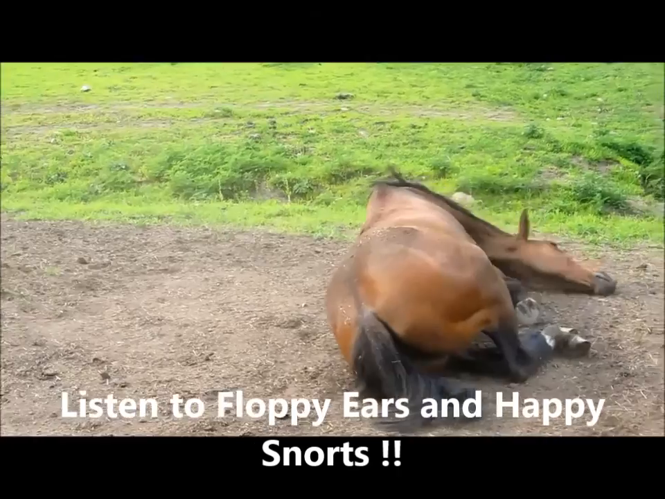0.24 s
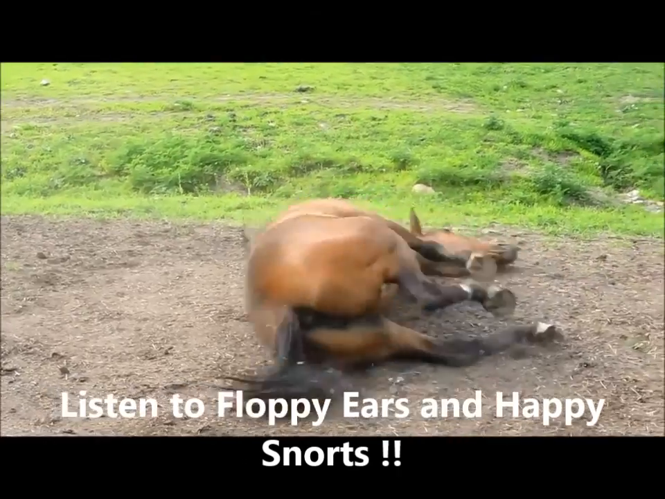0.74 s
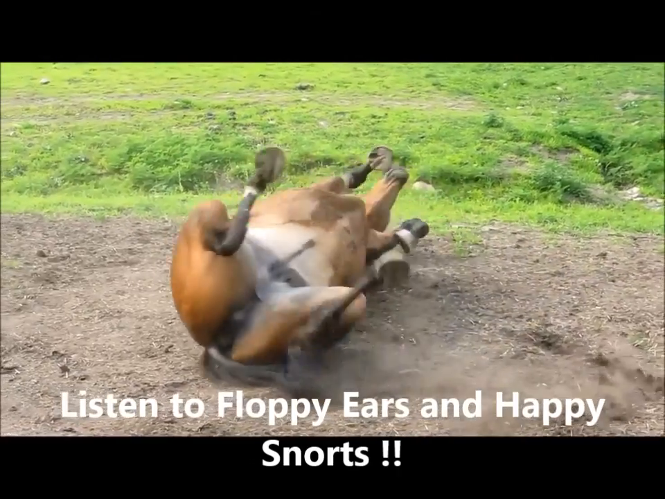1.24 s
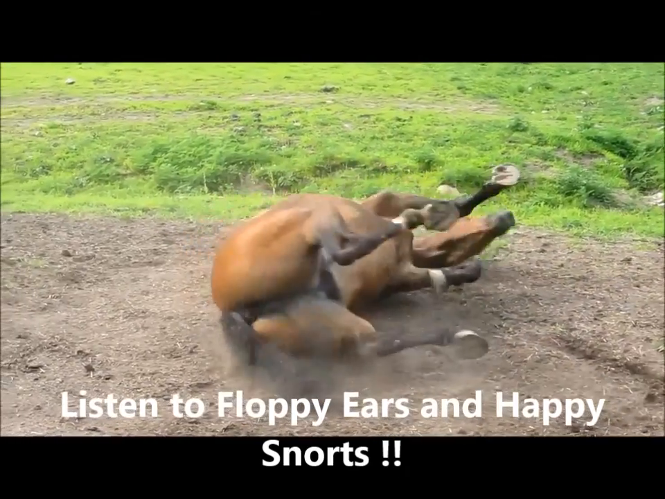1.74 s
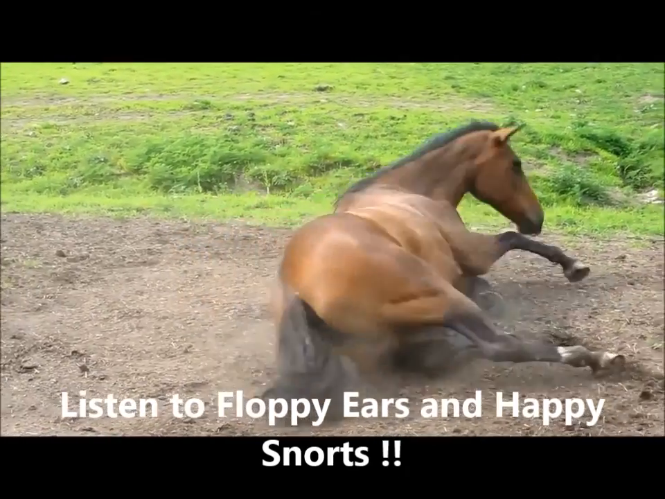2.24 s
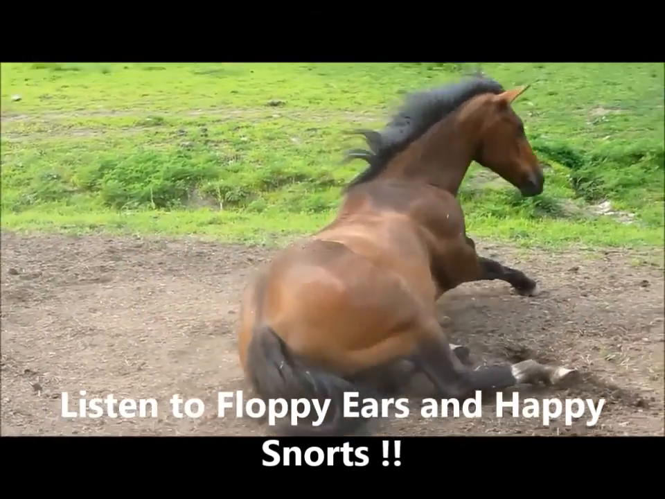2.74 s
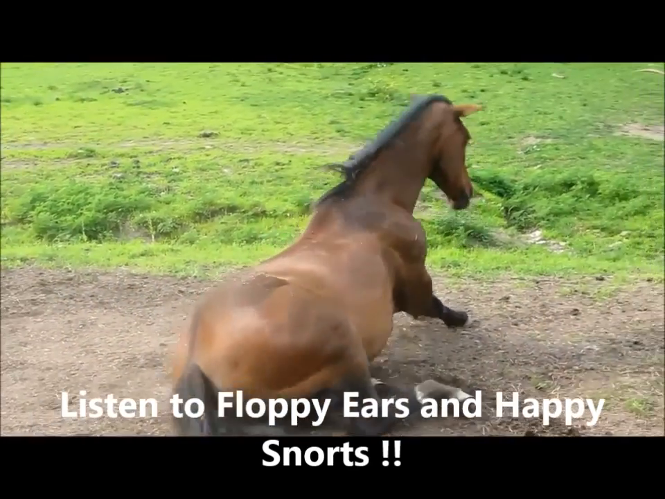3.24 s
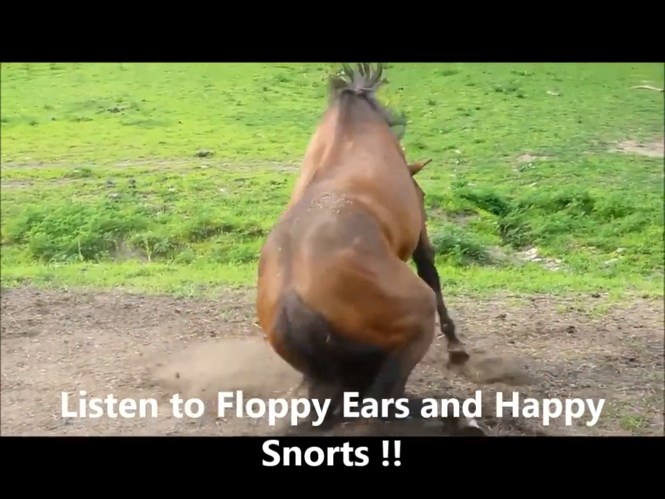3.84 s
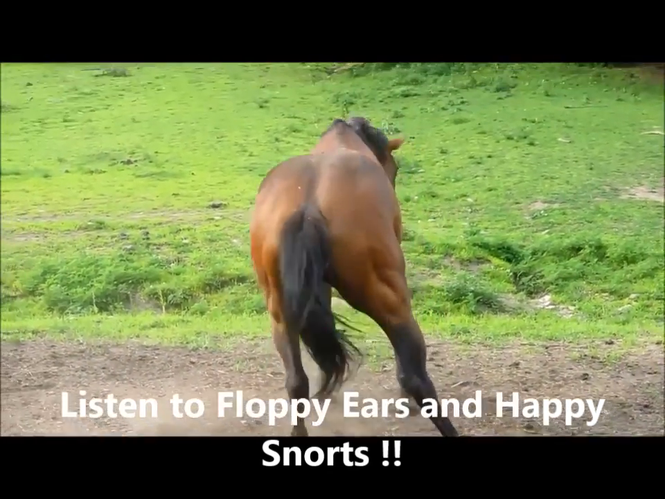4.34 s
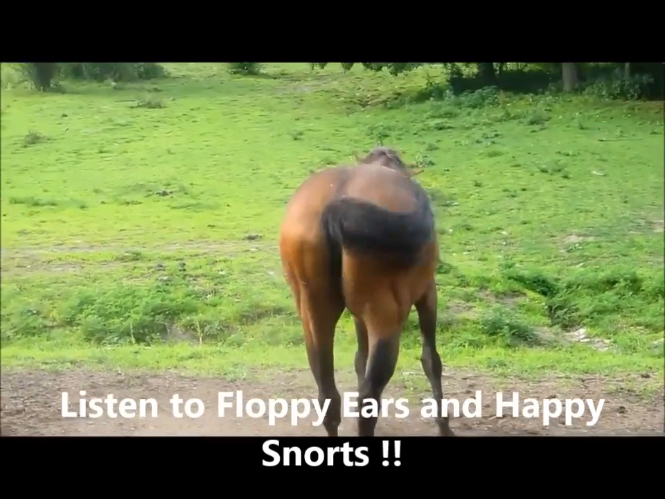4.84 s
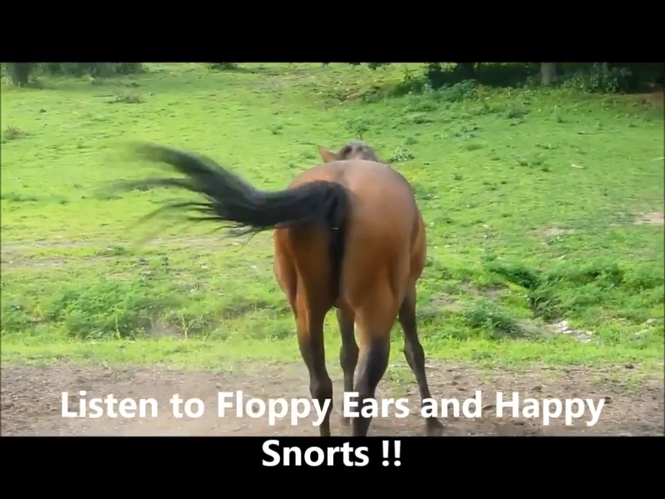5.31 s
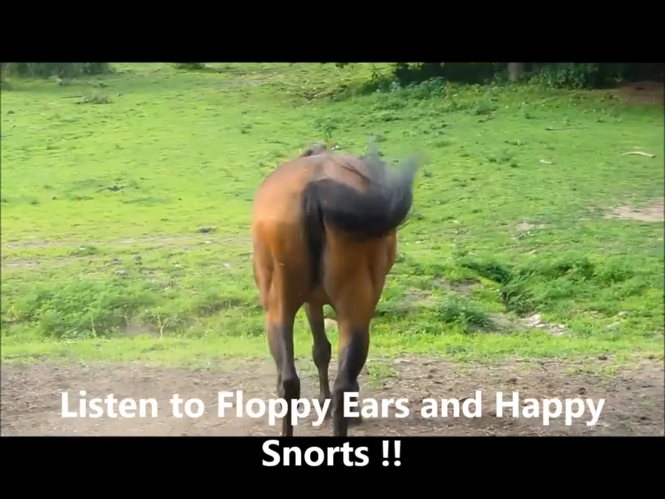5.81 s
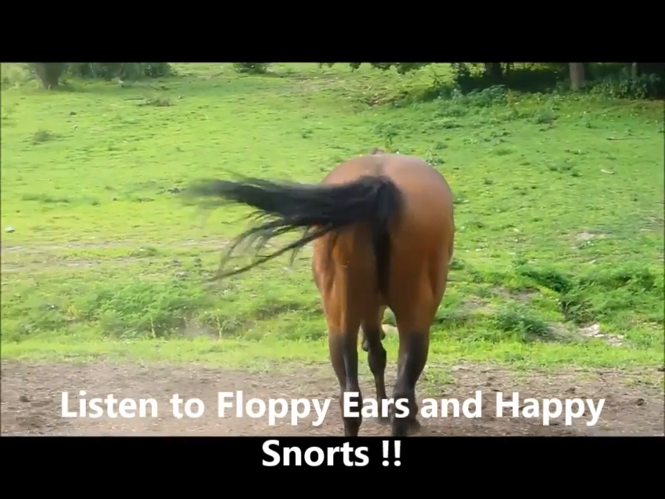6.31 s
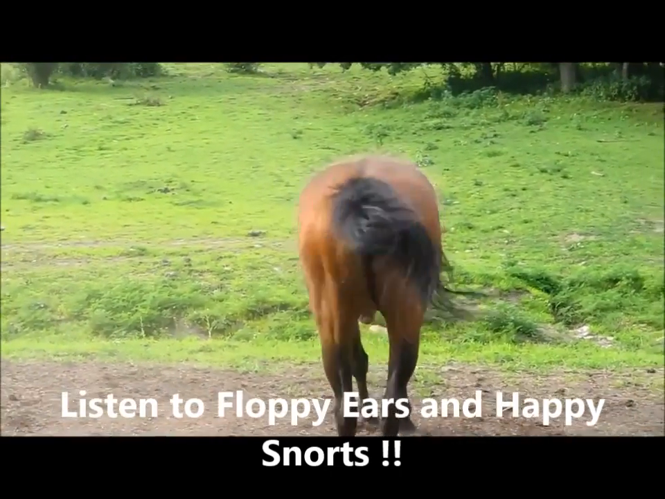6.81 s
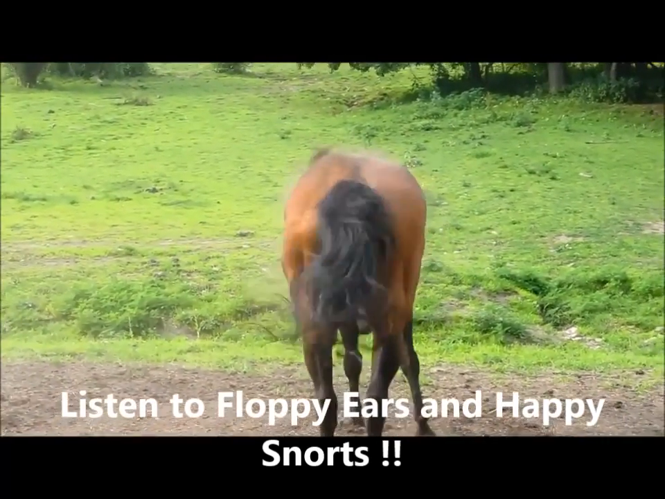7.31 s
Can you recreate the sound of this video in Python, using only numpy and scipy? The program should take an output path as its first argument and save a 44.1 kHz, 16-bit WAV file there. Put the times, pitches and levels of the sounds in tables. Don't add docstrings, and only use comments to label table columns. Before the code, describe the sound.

Quiet outdoor paddock in stereo: faint distant country noise and slight low wind bumps. A horse rubs and slides on dry soil, hooves ticking on pebbles, then rises with a rough sinking grunt running into a wet nostril-flapping snort. Airy tail swishes follow, then a short grunt, a harder snort, small puffs and a rapid dull flutter of ears. Throughout, a piercing bird whistle repeats regularly, ringing on in the trees and growing louder.

```python
import sys
import numpy as np
from scipy import signal
from scipy.io import wavfile
from scipy.ndimage import uniform_filter1d

SR = 44100
rng = np.random.default_rng(int(sys.argv[2]) if len(sys.argv) > 2 else 0)


def convert_level_to_amplitude(level_db):
    exponent = np.asarray(level_db, float) / 20
    return 10 ** exponent


def wrap_up_sound(samples):
    columns = np.atleast_2d(samples).T
    tamed = np.clip(columns, -1, 1)
    steps = np.round(tamed * 32767).astype(np.int16)
    wavfile.write(sys.argv[1], SR, steps)


N = 333396


def at_hz(points, hz):
    points = np.array(points)
    return np.interp(np.log(hz), np.log(points[:, 0]), points[:, 1])


def rms_one(x):
    return x / np.sqrt(np.mean(x ** 2) + 1e-20)


def drift(rate_hz, size=N):
    r = np.exp(-2 * np.pi * rate_hz / SR)
    settle = 9000
    noise = rng.standard_normal(size + settle)
    return rms_one(signal.lfilter([1], [1, -2 * r, r * r], noise)[settle:])


def band(x, low_hz, high_hz):
    return signal.sosfilt(signal.butter(2, [low_hz, high_hz], "band", fs=SR, output="sos"), x)


def resonate(x, modes):
    out = 0
    for k, (hz, width_hz, level_db) in enumerate(modes):
        r = np.exp(-np.pi * width_hz / SR)
        top = [(1 - r * r) / 2, 0, (r * r - 1) / 2]
        bottom = [1, -2 * r * np.cos(2 * np.pi * hz / SR), r * r]
        out = out + (-1) ** k * convert_level_to_amplitude(level_db) * signal.lfilter(top, bottom, x)
    return out


def patchy(x, modes, patch_db):
    out = 0
    for k, mode in enumerate(modes):
        out = out + (-1) ** k * resonate(x, [mode]) * convert_level_to_amplitude(patch_db * drift(20, size=len(x)))
    return out


def swell(middle_s, half_s):
    out = np.zeros(N)
    first = max(round((middle_s - 4 * half_s) * SR), 0)
    last = min(round((middle_s + 4 * half_s) * SR), N)
    near = np.arange(first, last)
    out[near] = np.exp(-((near / SR - middle_s) / half_s) ** 2)
    return out


def spell(rows):
    time_s, *columns = np.transpose(rows)
    t = np.arange(time_s[0], time_s[-1], 1 / SR)
    return round(time_s[0] * SR), [np.interp(t, time_s, c) for c in columns]


def add(out, start, x):
    x = x[..., max(-start, 0):N - start]
    start = max(start, 0)
    out[..., start:start + x.shape[-1]] += x


# time_s, pitch_hz, effort_db
GRUNT_RISING = [(3.74, 169.3, -58), (3.782, 169.4, -41.5), (3.863, 124, -37.5), (3.928, 127.8, -37.5),
                (3.956, 108.5, -38.5), (3.985, 92, -33.5), (4.02, 79.5, -50)]
GRUNT_STANDING = [(5.919, 120, -81), (5.942, 115.5, -61.5), (6.054, 118.2, -50), (6.101, 108.3, -48),
                  (6.15, 100, -41.5), (6.192, 88.3, -41), (6.244, 68.9, -40.5), (6.269, 61.2, -62)]
GRUNT_AFTER = [(6.61, 72, -68), (6.66, 87.5, -51.5), (6.72, 89.8, -60), (6.759, 87.4, -47),
               (6.831, 97.4, -44), (6.86, 94, -67)]
# hz, level_db
THROAT = [(130, 2), (170, -5.5), (200, 1.5), (250, -5.5), (340, -21)]
# hz, width_hz, level_db
GRUNT_NOSE = [(647, 58, 7), (824, 130, 4.5), (1365, 120, -1), (2790, 260, -7), (3570, 150, -21)]


def grunts():
    out = np.zeros(N)
    breath_peaks_db = (-45, -54, -58)
    for rows, breath_peak_db in zip((GRUNT_RISING, GRUNT_STANDING, GRUNT_AFTER), breath_peaks_db):
        start, (pitch_hz, first_db) = spell(rows)
        size = len(pitch_hz)
        slack = np.clip(np.linspace(-1, 1, size), .12, 1)
        phase = 2 * np.pi * np.cumsum(pitch_hz * (1 + .07 * slack * drift(40, size=size))) / SR

        second_db = first_db + at_hz(THROAT, 2 * pitch_hz)
        lines = convert_level_to_amplitude(first_db) * np.sin(phase)
        lines += convert_level_to_amplitude(second_db) * (np.sin(2 * phase + .96) + .2 * np.sin(3 * phase + 3.5))
        lines *= 1 + .4 * slack * np.cos(phase / 2 + .6)
        chest = rms_one(band(rng.standard_normal(size), 90, 380))
        lines += .3 * convert_level_to_amplitude(first_db) * chest

        gate = 2.8 + ((1 + np.cos(phase)) / 2) ** 3
        breath = rms_one(patchy(gate * rng.standard_normal(size), GRUNT_NOSE, patch_db=2.5))
        breath_db = breath_peak_db + .25 * (first_db - first_db.max())
        roughness = convert_level_to_amplitude(3.2 * slack * drift(57, size=size))
        add(out, start, np.sqrt(2) * lines * roughness + convert_level_to_amplitude(breath_db) * breath)
    return out


# time_s, effort_db
SNORTS = [
    [(4.012, -44), (4.034, -32), (4.1, -32), (4.18, -37.5), (4.248, -42), (4.3, -56), (4.46, -76)],
    [(5.66, -86), (5.684, -60.5), (5.766, -58.5), (5.8, -103)],
    [(6.225, -80), (6.257, -39.5), (6.295, -37.5), (6.315, -26), (6.332, -35), (6.35, -39.5),
     (6.425, -42.5), (6.445, -55), (6.48, -52)],
    [(6.48, -52), (6.6, -59), (6.66, -58.5), (6.73, -58)],
    [(6.73, -61), (6.758, -48), (6.782, -56), (6.824, -45.5), (6.87, -73)],
]
# slaps_per_s, full_flutter_db, full_bright_db
NOSTRILS = [(23.6, -36.5, 0.5), (49.3, -53.5, 12), (23.3, -36, 1.5), (95, -52.5, 3), (80.5, -44, 3)]
SPRAY_DB = [-22, -30, -33, -30, -30]
# middle_s, half_s, low_air_db, bright_air_db
SPURTS = [(4.039, 0.0063, -3, 9.5), (4.061, 0.0072, 2, 4), (4.07, .004, -1.5, 3.5), (4.085, .004, -8, 2),
          (4.112, 0.0096, 2, 5.5), (4.15, .008, 0.5, 8.5), (4.163, .003, 5, 3), (4.2, 0.0089, 0, 6),
          (4.25, 0.0066, 1.5, 11), (4.279, 0.005, 3, 18), (4.33, .0015, -3, 12), (6.266, 0.0053, 0, 4),
          (6.288, .004, -8, -6), (6.302, .005, 6, 2), (6.322, 0.0055, 2.5, 2), (6.327, 0.0069, -14, -9),
          (6.356, 0.0078, 7.5, 10), (6.365, 0.007, 3.5, 6), (6.373, .003, -5, -8), (6.41, .012, -2.5, 8),
          (6.424, .009, 5, 6)]
# hz, width_hz, level_db
NOSE_LOW = [(808, 143, 4), (1064, 215, 1), (1480, 190, 8)]
NOSE_HIGH = [(1765, 250, -9), (2250, 170, -5.5), (2950, 170, -9.5), (3500, 470, -10.5), (4170, 3000, -10.5)]


def snorts():
    out = np.zeros(N)
    slap_modes = [(92, 61, -.5), (128, 27, 5), (202.6, 41, 6), (335, 240, -9)]
    for rows, (slaps_per_s, full_flutter_db, full_bright_db), spray_db in zip(SNORTS, NOSTRILS, SPRAY_DB):
        start, (air_db,) = spell(rows)
        size = len(air_db)
        below_peak_db = air_db - air_db.max()
        flutter_db = full_flutter_db + .73 * below_peak_db
        bright_db = full_bright_db + .75 * below_peak_db

        turns = np.cumsum(slaps_per_s * convert_level_to_amplitude(1.3 * drift(30, size=size))) / SR
        slaps = np.diff(np.floor(turns), prepend=0) * convert_level_to_amplitude(drift(73, size=size))
        slaps += .053 * rng.standard_normal(size)
        push = rms_one(resonate(slaps, slap_modes))

        chop_db = 1.5 * np.cos(2 * np.pi * turns) + 2.3 * drift(220, size=size)
        rush = convert_level_to_amplitude(chop_db) * rng.standard_normal(size)
        low = patchy(band(rush, 657, 1464), NOSE_LOW, patch_db=1.3)
        high = patchy(band(rush, 1140, 3700), NOSE_HIGH, patch_db=3.5)
        drops = rush * (rng.random(size) < .05)
        spray = band(drops, 3400, 7200) * convert_level_to_amplitude(spray_db + 8)

        t = (start + np.arange(size)) / SR
        low_db, high_db = sum(np.array(dbs)[:, None] * np.exp(-((t - middle_s) / half_s) ** 2)
                              for middle_s, half_s, *dbs in SPURTS)
        scale = np.sqrt(uniform_filter1d(low ** 2, size=2600) + 1e-12)
        air = (convert_level_to_amplitude(low_db) * low + convert_level_to_amplitude(bright_db + high_db) * (high + spray)) / scale
        n = np.arange(size)
        fade = np.clip(np.minimum(n, n[::-1]) / 60, 0, 1)
        add(out, start, fade * (convert_level_to_amplitude(air_db) * air + convert_level_to_amplitude(flutter_db) * push))
    return out


# start_s, end_s, from_hz, to_hz, level_db
WHEEZES = [(3.7, 3.773, 2950, 2900, -57), (3.8, 3.894, 2620, 2950, -49.5), (3.817, 3.863, 4500, 4900, -65),
           (3.921, 4.013, 3500, 3980, -49), (3.919, 4.01, 2680, 2960, -45), (3.92, 3.976, 4670, 5170, -56),
           (6.097, 6.169, 2790, 2830, -60), (5.72, 5.778, 2310, 2515, -56.5)]
# start_s, end_s, from_hz, to_hz, level_db
FAR_BIRD = [
    (5.256, 5.304, 2500, 2620, -68),
    (5.302, 5.418, 2840, 3100, -61.5),
]


def airy_whistles():
    out = np.zeros(N)
    for start_s, end_s, from_hz, to_hz, level_db in WHEEZES + FAR_BIRD:
        size = round((end_s - start_s) * SR)
        phase = 2 * np.pi * np.cumsum(np.linspace(from_hz, to_hz, size)) / SR
        airy = drift(140, size=size) * np.sin(phase) + drift(160, size=size) * np.cos(phase)
        add(out, round(start_s * SR), convert_level_to_amplitude(level_db) * np.hanning(size) ** .5 * airy)
    return out


# middle_s, half_s, hiss_db, rustle_db
SWISHES = [(0.035, 0.04, -64, -61), (1.016, 0.13, -54, -60.5), (1.162, 0.015, -74, -60),
           (1.318, 0.28, -57.5, -64.5), (2.327, 0.022, -53, -54), (2.506, 0.036, -61, -59),
           (3.034, 0.0065, -54, -61), (3.736, 0.18, -57.5, -57.5), (4.103, 0.21, -52.5, -51),
           (4.46, 0.086, -63, -61.5), (4.654, 0.079, -60.5, -59.5), (4.938, 0.082, -51.5, -56),
           (6, 0.11, -62.5, -63.5), (6.315, 0.11, -55, -50), (7.095, 0.23, -66, -57)]
# middle_s, hiss_db
TAIL = [
    (4.793, -45.5),
    (5.287, -51.5),
    (5.79, -45.5),
]
# start_s, push_db, mane_hiss_db
FLAPS = [(6.817, -35, -58), (6.887, -35, -49), (6.946, -39, -49.5), (7.002, -39, -47), (7.068, -37, -54),
         (7.13, -35.5, -47.5), (7.202, -33.5, -55), (7.265, -32, -51), (7.332, -46, -55), (7.396, -36, -53),
         (7.468, -45.5, -57)]


def rustle():
    tail = [(s, .03, hiss_db, hiss_db - 17.5) for s, hiss_db in TAIL]
    mane = [(s + .014, .025, hiss_db, -57) for s, _, hiss_db in FLAPS]
    bright, dull = sum(convert_level_to_amplitude(dbs)[:, None] * swell(middle_s, half_s)
                       for middle_s, half_s, *dbs in SWISHES + tail + mane)
    mid, side = rng.standard_normal((2, 2, N)) * convert_level_to_amplitude(2.66 * drift(76))
    hiss = rms_one(band(mid[0] + .45 * side[0] * [[1], [-1]], 9000, 13450))
    hiss += .3 * rms_one(band(mid, 4800, 7800))
    dust = rms_one(band(mid[0] + .4 * side[0] * [[1], [-1]], 410, 5220))
    return bright * hiss + 1.87 * dull * dust


# start_s, peak_db, body_hz, crack_re_peak_db, top_7_to_11khz_db
TICKS = [(0.5186, -47, 3300, -3, -84), (0.5842, -58, 1230, 14, -82), (1.159, -63, 1590, -4, -76),
         (1.3874, -49, 2320, 18, -75), (1.219, -62, 3000, 3, -65), (1.434, -64, 3000, 3, -69),
         (1.6506, -49, 1450, 14, -80), (2.43, -54, 3000, 3, -69), (2.502, -60, 3000, 3, -67),
         (5.43, -58, 3000, 7, -78), (7.001, -38, 4840, -1, -53), (7.236, -40.5, 3700, 10, -66),
         (2.401, -49, 1440, 13, -71), (3.3132, -46.5, 3730, 10, -65), (3.7338, -35, 1550, 13.5, -57),
         (4.389, -39.5, 2280, 2, -67), (4.5786, -48.5, 2200, 17.5, -49.5), (4.893, -42.5, 3570, 8.5, -56.5),
         (6.211, -57, 2360, 13, -56), (7.094, -34.5, 2940, 11, -58.5), (7.2852, -17, 2650, -9, -58.5),
         (7.3606, -38, 2950, 2, -67), (7.3716, -42, 1650, -5, -65), (7.424, -49, 2730, 21.5, -64),
         (7.5365, -51, 1270, -7, -74)]
# start_s, peak_db, body_hz, crack_re_peak_db, top_7_to_11khz_db
CLODS = [
    (3.03, -48, 354, -16, -73),
    (3.537, -51, 730, 14, -71),
    (3.624, -44, 790, -14, -75),
    (6.459, -40, 950, 2, -72),
    (6.687, -41.5, 915, -20, -83),
    (6.745, -45, 792, -14, -79),
]


def ticks():
    out, t = np.zeros(N), np.arange(2600) / SR
    for start_s, peak_db, body_hz, crack_db, top_db in TICKS + CLODS:
        grit = rng.standard_normal(len(t))
        body = 2.98 * np.sin(2 * np.pi * body_hz * t) * (t * body_hz) * np.exp(-t * body_hz / .54) * 4
        bounce = np.sin(2 * np.pi * body_hz * .85 * t) * (t < .0026)
        body[66:] += .4 * bounce[:-66]
        crack = convert_level_to_amplitude(peak_db + crack_db) * band(grit, 680, 3800)
        crack += convert_level_to_amplitude(top_db + 25) * band(grit, 7200, 11200)
        ring = convert_level_to_amplitude(peak_db) * band(body, body_hz * .55, body_hz * 2.2)
        add(out, round(start_s * SR), ring + crack * np.exp(-t / .0022))
    return out


# start_s, peak_db
THUMPS = [(1.171, -47.5), (2.333, -49), (2.51, -48), (3.031, -43), (4.412, -43.5), (4.636, -45),
          (6.309, -26.5), (6.409, -46)]


def thumps():
    out, t = np.zeros(N), np.arange(2600) / SR
    pushes = [(s, peak_db, 197) for s, peak_db in THUMPS]
    pushes += [(s, push_db, 165 * rng.uniform(.8, 1.3)) for s, push_db, _ in FLAPS]
    for start_s, peak_db, hz in pushes:
        push = np.sin(2 * np.pi * hz * t) * np.exp(-t / .0084)
        push += .17 * np.sin(2 * np.pi * 55 * t) * np.exp(-t / .026)
        add(out, round(start_s * SR), convert_level_to_amplitude(peak_db) * push)
    return out


# multiple, level_db
OVERTONES = [(.5, -21.5), (1, 0), (1.5, -25), (2, -26), (2.5, -31), (3, -32), (3.5, -41)]


def whistle(hz, level_db, lag_us, pan_db, facing_db, away_db):
    turns = np.cumsum(hz) / SR - hz * 1e-6 * lag_us * np.array([[1], [0]])
    half_db = 1.5 + .36 * away_db
    thinning = -4.5 * np.linspace(-.3, .7, len(hz))
    tone = 0
    for k, db in OVERTONES:
        partial_db = db + (facing_db + thinning * k) * (k > 1) + half_db * (k < 1)
        tone = tone + convert_level_to_amplitude(partial_db) * np.sin(2 * np.pi * k * turns)
    return np.sqrt(2) * convert_level_to_amplitude(level_db + pan_db * np.array([[.5], [-.5]])) * tone


def trees(x, echo_db):
    far_t60_s, near_t60_s = .95, .22
    t = np.arange(SR) / SR
    far = convert_level_to_amplitude(-17 - 60 * t / far_t60_s) * np.sqrt(14 / far_t60_s / SR)
    near = convert_level_to_amplitude(-11 - 60 * t / near_t60_s) * np.sqrt(14 / near_t60_s / SR)
    white = rng.standard_normal((3, SR))
    dull = signal.sosfilt(signal.butter(6, 4500, fs=SR, output="sos"), white)
    scatter = band(white * near + dull * far * .7, 770, 14400) * np.clip(t / .0011, 0, 1)

    x = np.pad(x, ((0, 0), (0, 400)))
    n = np.arange(x.shape[1])
    behind = sum(np.interp(n * (1 - shift), n, x[1]) for shift in (.02, .04))
    same_side = signal.fftconvolve(x, scatter[2:], axes=1)
    opening = np.clip(t / .047, .15, 1)
    all_round = signal.fftconvolve(.6 * x[1:] + .86 * behind, scatter[:2] * opening, axes=1)
    sway = convert_level_to_amplitude(1.5 * drift(60, size=same_side.shape[1]))

    hits = rng.random((2, SR)) < 45 / SR
    trunks = convert_level_to_amplitude(-22 - 45 * t / far_t60_s) * hits * white[:2] * (t > .04)
    late = signal.fftconvolve(behind[None], trunks, axes=1)
    echo = convert_level_to_amplitude(echo_db) * (sway * (same_side + all_round) + .37 * late)
    return echo + np.pad(x, ((0, 0), (0, SR - 1)))


# start_s, top_hz, dip_hz, opening_db, closing_db
WHISTLES = [(0.259, 4787, 4520, -39.5, -42.5), (0.626, 4874, 4366, -36.5, -41),
            (1.025, 4910, 4390, -35.5, -33), (1.459, 4890, 4370, -32, -36.5),
            (1.84, 4975, 4454, -30.5, -31.5), (2.25, 5106, 4520, -36.5, -37),
            (2.683, 5050, 4480, -41.5, -44), (3.167, 4905, 4410, -43.5, -40),
            (3.664, 4930, 4310, -27, -28.5), (4.424, 4874, 4376, -25.5, -25.5),
            (4.937, 4884, 4340, -23.5, -27.5), (5.565, 4885, 4290, -26.5, -27),
            (6.207, 4796, 4337, -22.5, -26), (6.909, 4830, 4284, -30.5, -35)]
# length_s, slide_pace, last_bend_hz, sag_db
BENDS = [(0.13, 1.26, 140, 1.5), (.117, 0.86, 137, -0.5), (.117, .95, 160, -5), (.12, .85, 190, -9.5),
         (.128, 1, 193, -7), (0.13, 0.84, 226, -10), (0.11, 1.1, 6.8, -1.5), (0.11, 1.8, 216, -7),
         (.117, 0.77, 250, -6.5), (0.13, 1.2, 210, -7.5), (0.12, .95, 203, -12.5), (.117, 0.87, 170, -6),
         (.11, 0.984, 116, -9.5), (0.12, .8, 90, -0.5)]
ECHO_DB = [-3, -3.5, -1.5, -1.5, -1.5, 0, 1.5, 1.5, 0, 0, 1.5, 0, 4, 3]
# time_s, left_lag_us, left_right_db, overtones_db
BEARING = [(0.26, -18, 0, -4), (1.03, -16, 2.5, 0.5), (1.46, 14, 2, 1), (3.17, 25, 2.5, 3),
           (3.67, -15.5, 2.5, 2.5), (4.43, -11, 2, 4.5), (5.57, 55.5, -4, 5.5), (6.21, 98.5, -2, 3),
           (6.91, 133, 2, -1)]
# start_s, length_s, top_hz, level_db
ARCHES = [
    (-.008, 0.0365, 4910, -35.5),
    (0.078, 0.0324, 4795, -35),
]


def bird():
    out = np.zeros((2, N))
    at_s, *bearing = np.transpose(BEARING)
    for note, (length_s, pace, bend_hz, sag_db), echo_db in zip(WHISTLES, BENDS, ECHO_DB):
        start_s, top_hz, dip_hz, open_db, close_db = note
        u = np.arange(0, 1, 1 / (length_s * SR))
        paced = np.where(u < .12, u, .12 + (u - .12) / pace)
        slide = np.interp(paced, [0, .06, .12, .22, .36, .5, .68], [.31, .892, 1, .655, .226, .13, .002])
        upturn = bend_hz * np.interp(u, [.72, .83, .94], [0, .35, 1])
        hz = uniform_filter1d(dip_hz + (top_hz - dip_hz) * slide + upturn, size=300)
        level_db = np.interp(u, [.14, .28, .4, .55, .7],
                             [open_db, open_db + sag_db / 4, open_db + sag_db, close_db - 1, close_db])
        edges_db = -22 * np.exp(-u / .035) - 26 * np.clip((u - .91) / .09, 0, 1) ** 2
        away_db = .865 * (-29 - max(open_db, close_db))
        place = [np.interp(start_s, at_s, c) for c in bearing]
        call = whistle(hz, level_db + edges_db, *place, away_db)
        add(out, round(start_s * SR), trees(call, away_db + echo_db))
    for start_s, length_s, top_hz, level_db in ARCHES:
        u = np.arange(-1, 1, 2 / (length_s * SR))
        call = whistle(top_hz - 480 * u ** 2, level_db - 18 * u ** 4, -29, 2.7, -1.5, away_db=-2)
        add(out, round(start_s * SR), trees(call, echo_db=3))
    return out


# hz, density_db_per_hz
FIELD = [(18, -35), (30, -34), (103, 5), (138, 1), (227, 0.5), (355, 6), (394, -3), (866, 1), (3980, -11.5),
         (4530, -4.5), (5310, -11.5), (12600, -17), (16000, -81)]
# hz, correlation
LIKENESS = [(40, 0.57), (130, 0.21), (640, 0.65), (1400, 0.11), (3000, 0.23), (15000, 0.33)]


def field():
    out, together = 0, drift(1.5)
    edges_hz = 28 * 2 ** np.arange(0, 9.6, .5)
    white = rng.standard_normal((2, 2, N))
    flicker = [drift(1.3), drift(10.5), drift(42)]
    for k, (low_hz, high_hz) in enumerate(zip(edges_hz, edges_hz[1:])):
        centre_hz = np.sqrt(low_hz * high_hz)
        mid, side = band(white[k % 2], low_hz, high_hz)
        alike = np.clip(at_hz(LIKENESS, centre_hz), -1, 1)
        gain = convert_level_to_amplitude(at_hz(FIELD, centre_hz) + .7 * together + .7 * flicker[k % 3])
        out = out + gain * (np.sqrt(1 + alike) * mid + np.sqrt(1 - alike) * side * [[1], [-1]])
    return convert_level_to_amplitude(-55.5) * rms_one(out)


# middle_s, half_s, level_db
GUSTS = [(1.185, 0.13, -77), (2.248, 0.14, -67), (3.09, 0.11, -63), (3.983, 0.076, -48), (4.737, 0.12, -63),
         (5.747, 0.023, -47), (6.217, 0.048, -46), (7.023, 0.34, -50), (7.3, 0.18, -51)]


def wind():
    mid, side = band(rng.standard_normal((2, N)), 33, 80) * convert_level_to_amplitude(3.5 * drift(9))
    level = convert_level_to_amplitude(-73.5) + sum(convert_level_to_amplitude(level_db) * swell(s, half_s) for s, half_s, level_db in GUSTS)
    return rms_one(mid + .23 * side * [[1], [-1]]) * level


def scene():
    middle = grunts() + airy_whistles() + snorts() + ticks() + thumps()
    spread = convert_level_to_amplitude(-15) * np.roll(band(middle, 190, 11000), 97) * [[1], [-1]]
    return middle + spread + bird() + rustle() + field() + wind()


def top_cut(x):
    return signal.sosfilt(signal.butter(12, 16500, fs=SR, output="sos"), x)


def record(dry):
    dry = signal.lfilter(*signal.iirnotch(8200, 5.5, fs=SR), dry)
    dry = signal.sosfilt(signal.cheby2(3, 25, [8100, 8400], "stop", fs=SR, output="sos"), dry)
    dry = signal.sosfilt(signal.butter(3, 32, "high", fs=SR, output="sos"), dry)
    dry = signal.sosfilt(signal.ellip(10, .5, 45, 15800, fs=SR, output="sos"), dry)
    mix = dry * np.clip((N - np.arange(N)) / (.06 * SR) + .6, 0, 1)
    return top_cut(mix)


dry = scene()
out = record(dry)
wrap_up_sound(out)
```